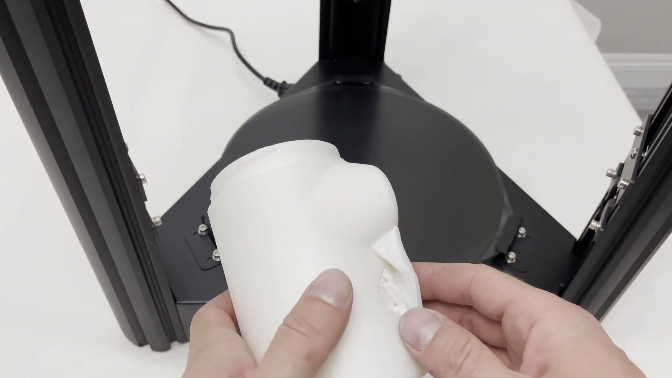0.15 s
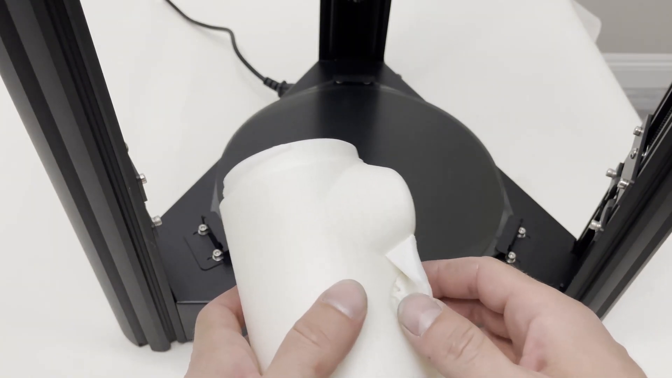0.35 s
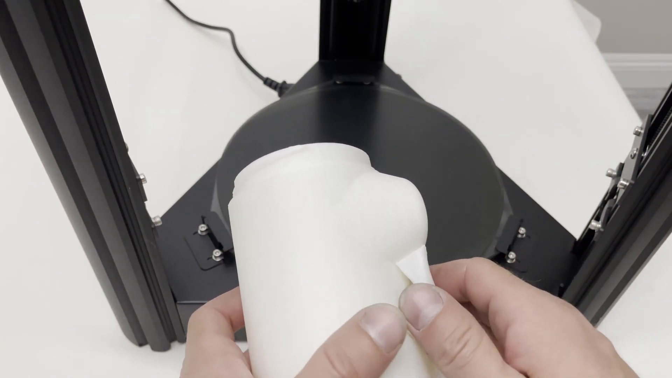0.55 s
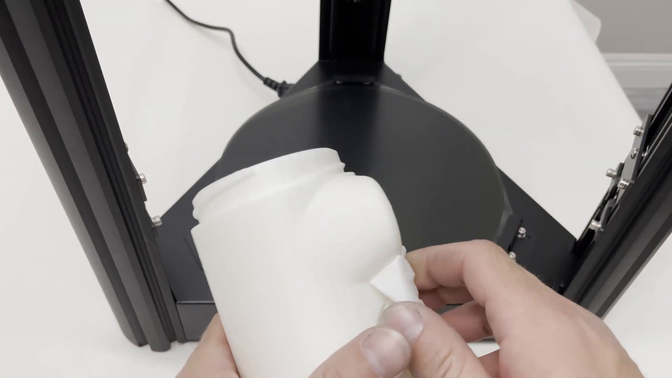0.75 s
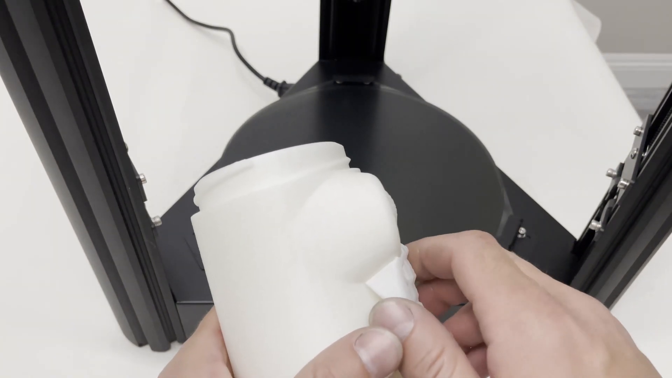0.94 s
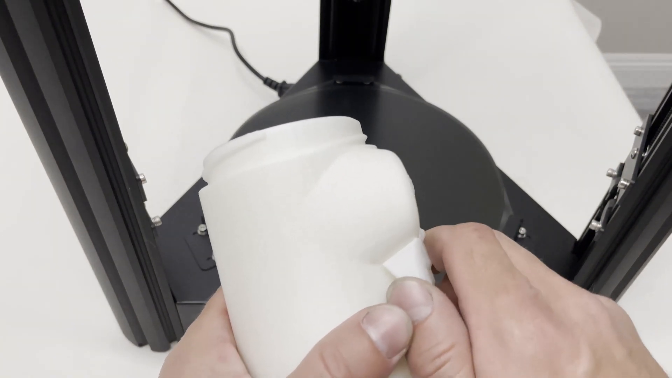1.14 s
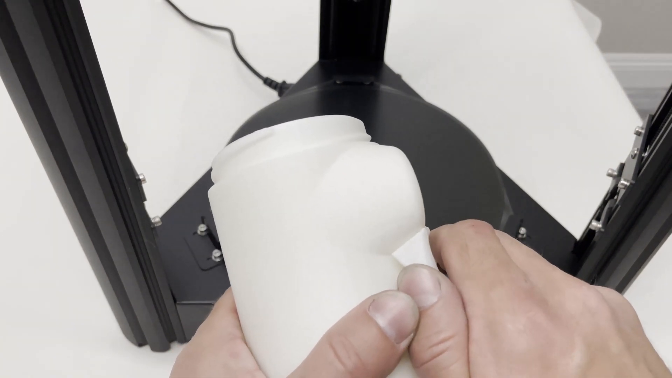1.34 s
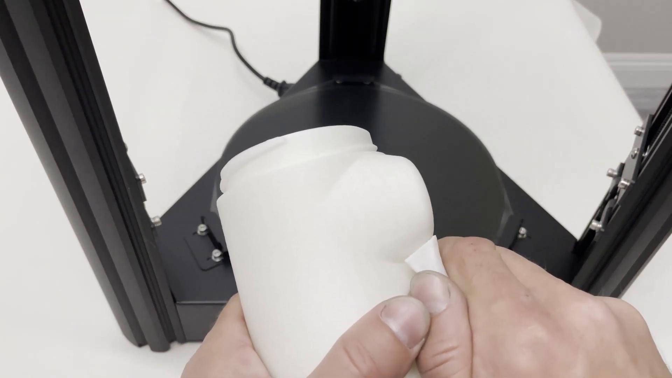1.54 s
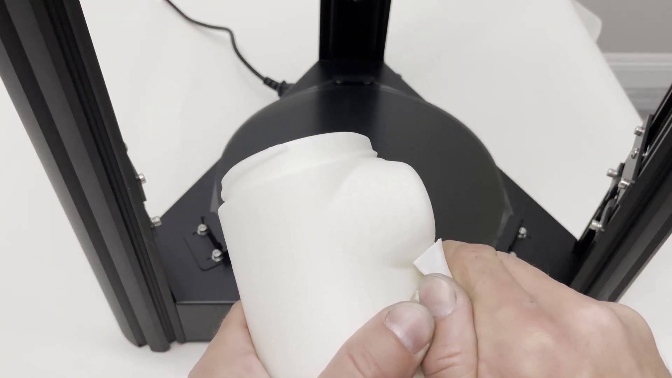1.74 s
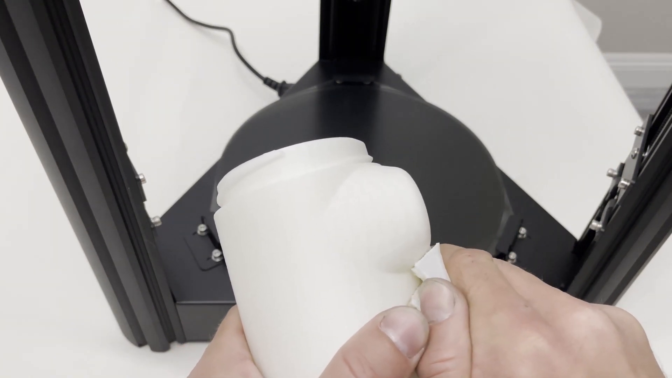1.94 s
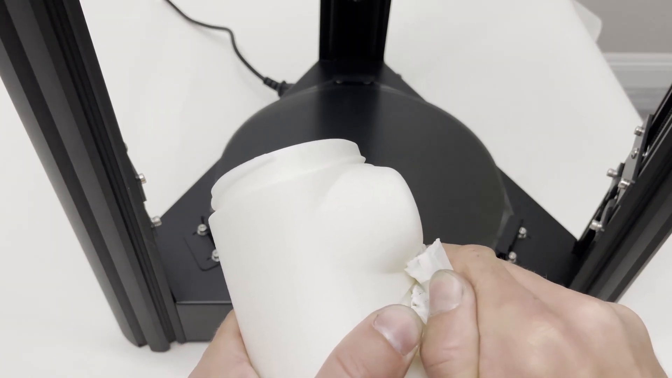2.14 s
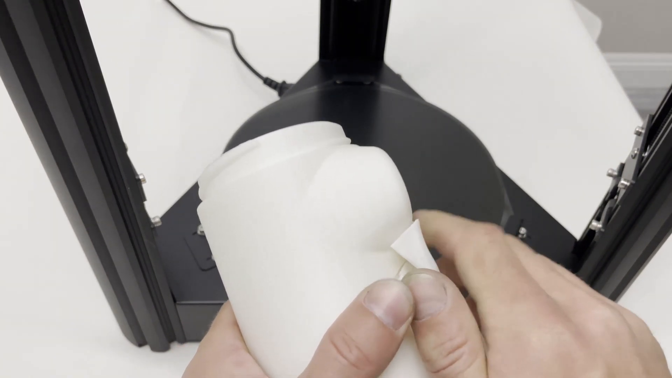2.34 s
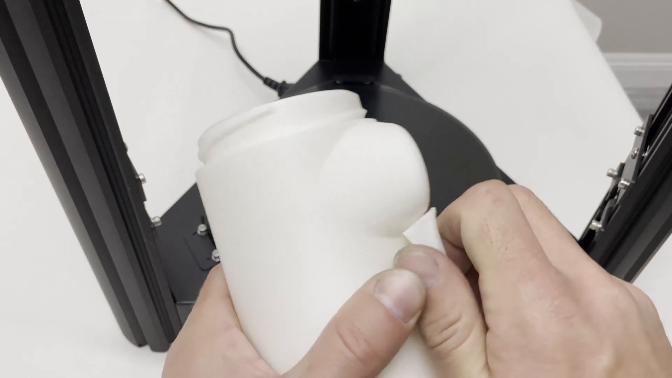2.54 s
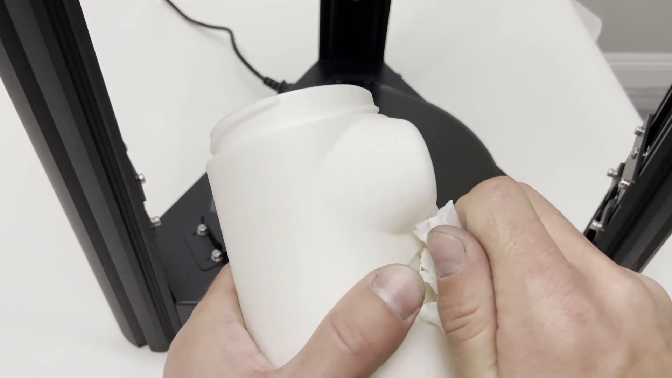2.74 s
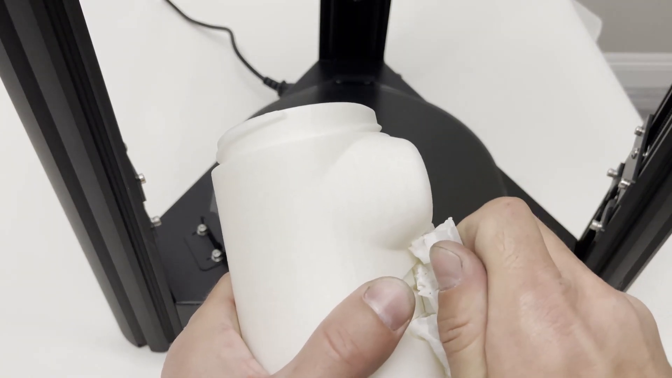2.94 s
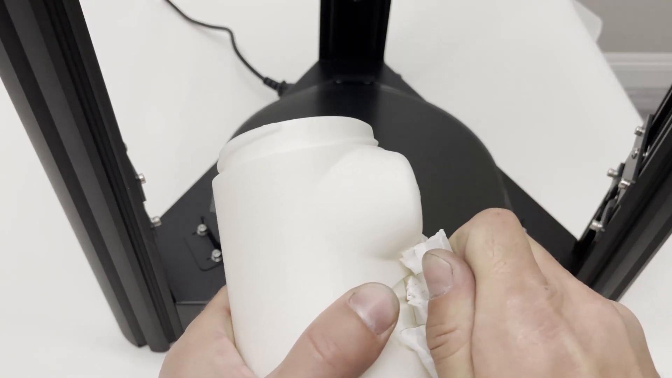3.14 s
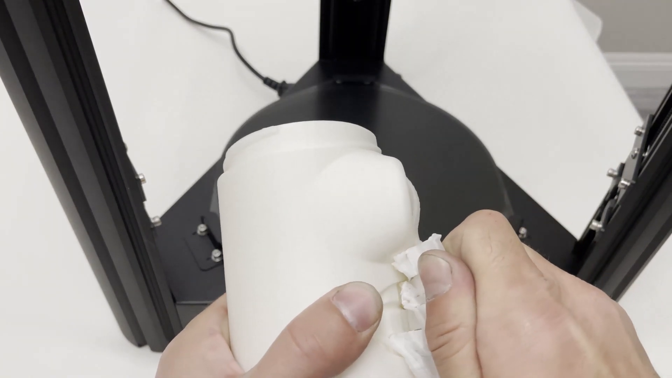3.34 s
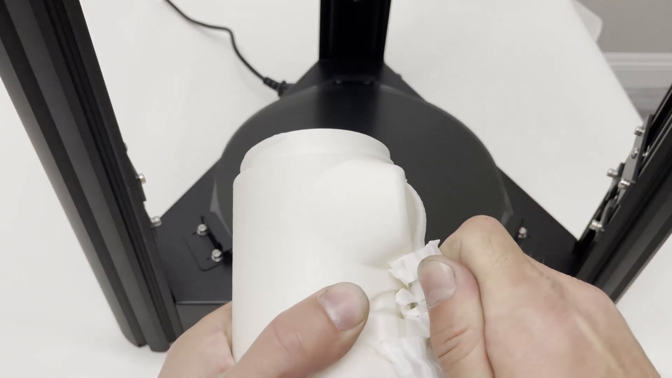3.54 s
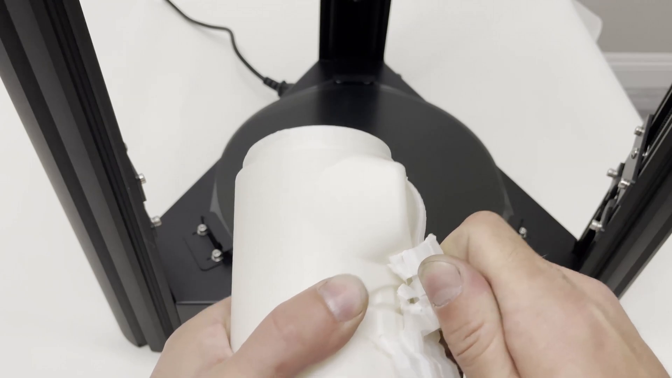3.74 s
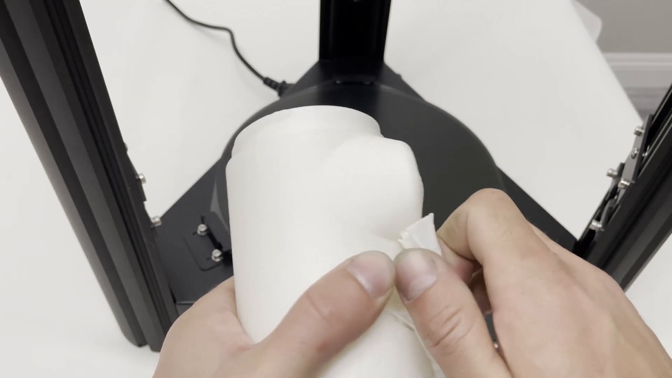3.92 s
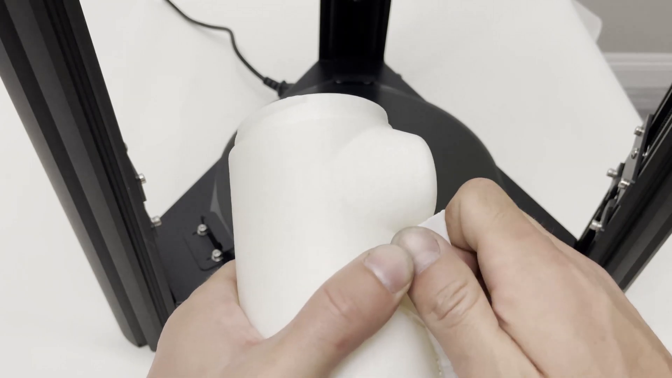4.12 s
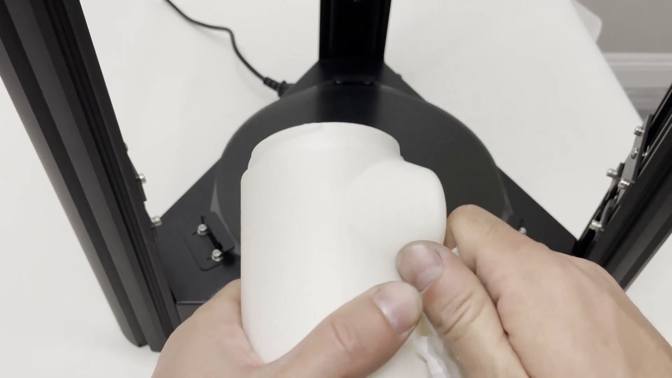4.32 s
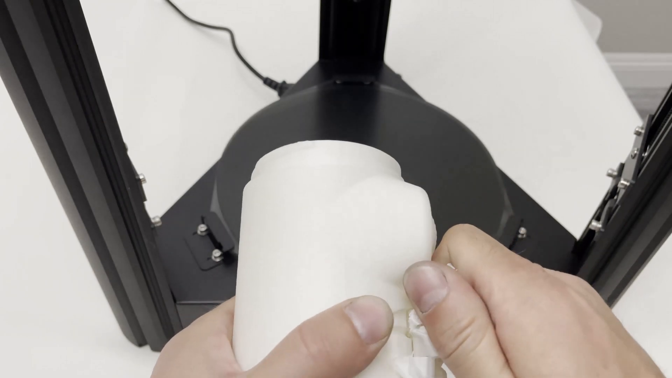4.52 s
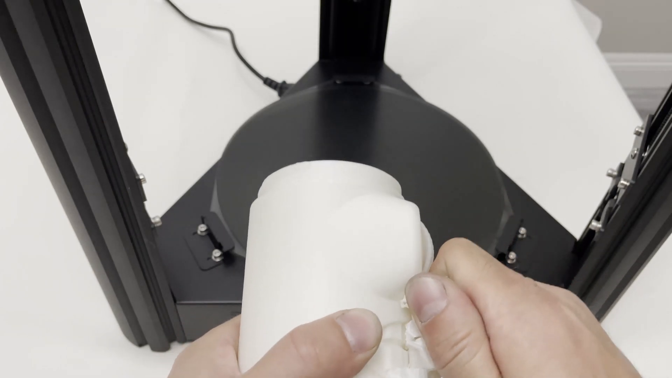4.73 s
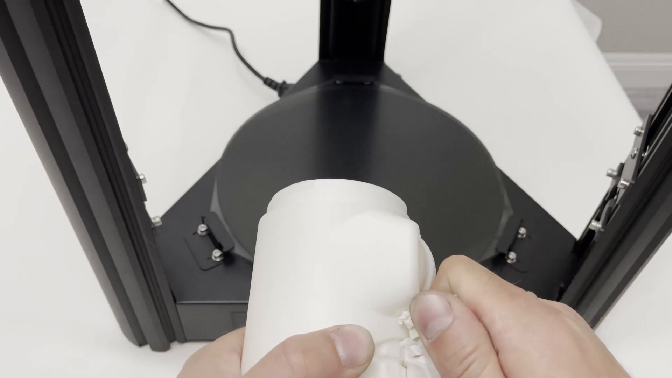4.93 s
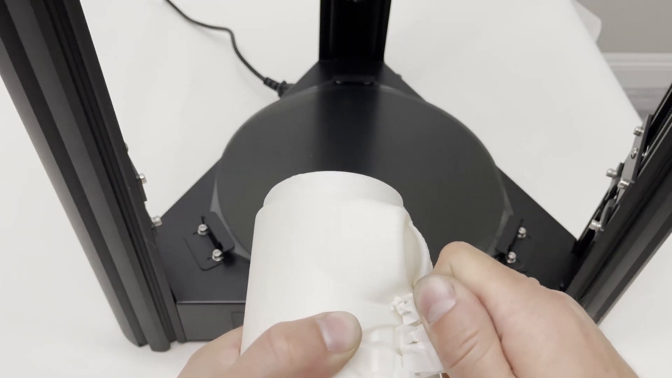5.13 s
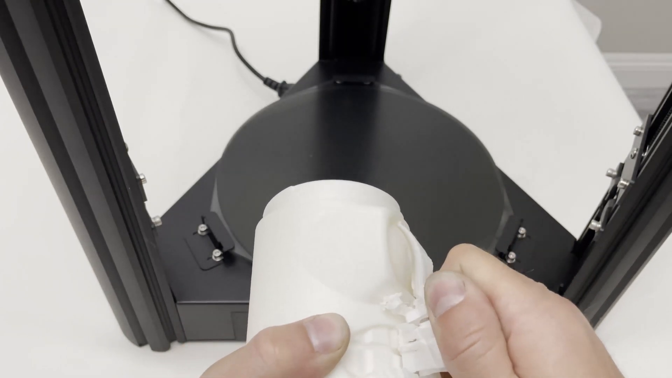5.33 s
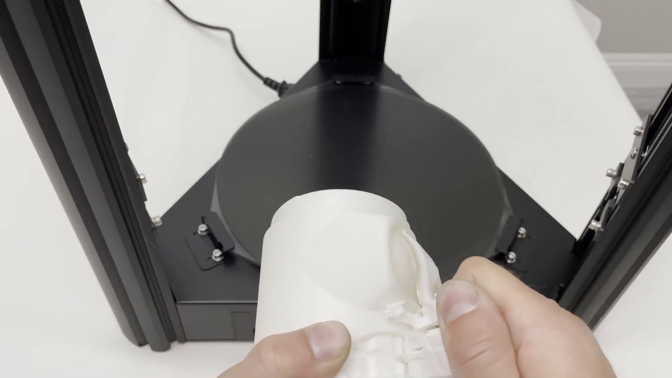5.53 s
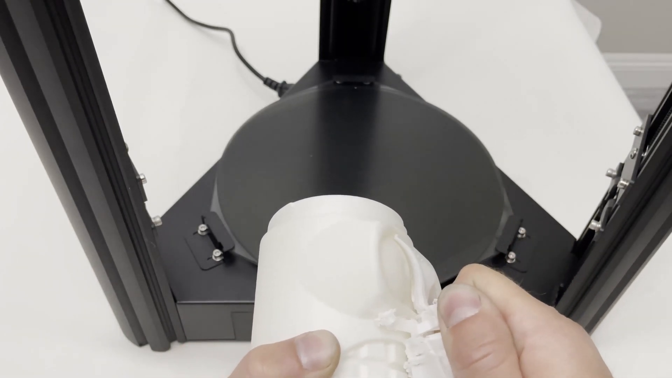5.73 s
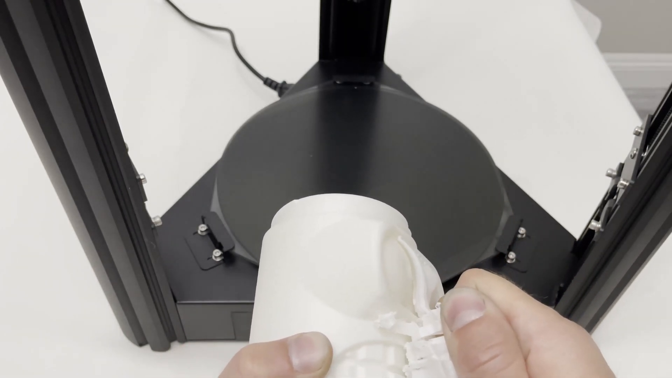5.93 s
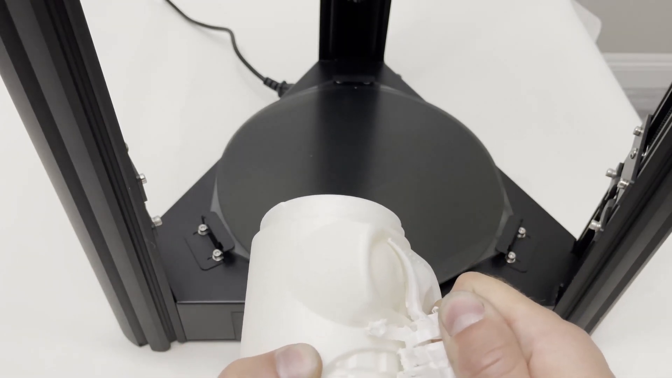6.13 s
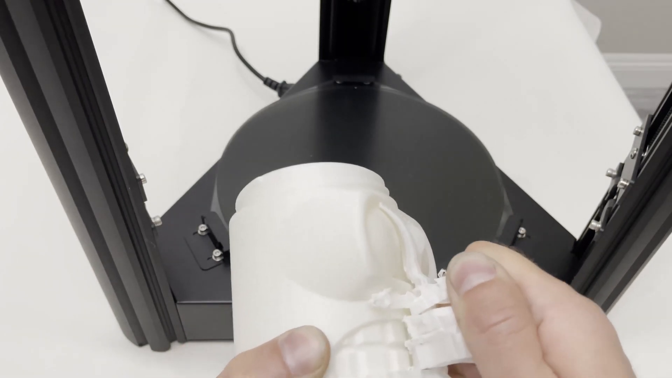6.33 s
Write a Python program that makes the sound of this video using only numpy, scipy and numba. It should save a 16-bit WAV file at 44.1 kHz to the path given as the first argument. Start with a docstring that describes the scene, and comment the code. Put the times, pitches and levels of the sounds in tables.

```python
"""Hands tear brittle plastic supports off a hollow printed object, close to a phone in a small room.
Each strand parts with a tick and a short tear, whose noise bursts excite wall and shell resonances.
Jolts of the object add knocks and thumps, and fingers rub its ridges as uneven grains of noise.
Under it lie a fan, made of shaped noise, and a slightly wavering mains hum, made of sines."""
import sys
import numpy as np
from scipy import signal
from scipy.fft import rfft, irfft, next_fast_len
from scipy.io import wavfile
from numba import njit

SR = 44100
rng = np.random.default_rng(int(sys.argv[2]) if len(sys.argv) > 2 else 0)


def generate_wav(signal):
    """Clip the signal to [-1, 1] and save it as 16-bit WAV at the path in sys.argv[1]."""
    frames = np.transpose(np.atleast_2d(signal))
    scaled = np.clip(frames, -1, 1) * 32767
    pcm = np.round(scaled).astype(np.int16)
    wavfile.write(sys.argv[1], SR, pcm)


N = 285309
SIZE = next_fast_len(N + SR)  # room for a one-second reverberant tail
FREQ = np.maximum(np.arange(SIZE // 2 + 1) * SR / SIZE, 1)


def undb(db):
    """Decibel definition: amplitude ratio is 10 to the power dB / 20."""
    return 10 ** (np.asarray(db) / 20)


def level(x, db):
    """Root-mean-square normalisation: scale a signal to the given rms level."""
    return x * undb(db) / np.sqrt(np.mean(x ** 2))


def over_hz(table):
    """Logarithmic frequency scale: interpolate the columns of a (Hz, ..) table at every frequency."""
    hz, *columns = np.transpose(table)
    return [np.interp(np.log(FREQ), np.log(hz), column) for column in columns]


@njit
def svf(x, hz, width):
    """Damped resonance: a state-variable band-pass with gain 1 at its centre."""
    y, band, low = np.empty(len(x)), 0., 0.
    g, damping = np.tan(np.pi * hz / SR), width / hz
    for i in range(len(x)):
        v = (band + g * (x[i] + 1e-18 - low)) / (1 + g * (g + damping))
        band, low = 2 * v - band, low + 2 * g * v
        y[i] = damping * v
    return y


def ring(x, modes, drive=lambda hz: 1):
    """Modal superposition: resonances of alternating sign, each driven by its own share of the force."""
    total = 0
    for k, (hz, width, db) in enumerate(modes):
        total = total + (-1) ** k * undb(db) * svf(x * drive(hz), 1. * hz, 1. * width)
    return total


def uneven_noise(scatter_db):
    """Impulsive noise: Gaussian samples whose dB sizes scatter exponentially, so a few stand out."""
    return rng.standard_normal(N) * undb(scatter_db * rng.exponential(1, N))


def tears(times, level_db, peak_ms, first_db, scatter_db):
    """Brittle fracture: a first break, then a spatter of fibre breaks that swells and dies away."""
    t = np.arange(1024) / SR
    out = np.zeros(N + len(t))
    for start, db in zip(times, level_db):
        sign, size = rng.standard_normal(len(t)), rng.exponential(1, len(t))
        swell = t * np.exp(-1000 * t / peak_ms)  # strongest at peak_ms
        burst = sign * undb(scatter_db * size) * swell
        burst = burst / np.linalg.norm(burst)
        burst[0] = undb(first_db) * np.sign(sign[0])
        i = int(start * SR)
        out[i:i + len(t)] += undb(db) * burst
    return out[:N]


def nearest(times, own_hz, octave_db, most_db):
    """Selective excitation: the latest break drives the modes near its own pitch hardest."""
    latest = np.maximum(np.searchsorted(times, np.arange(N) / SR, side="right") - 1, 0)

    def drive(hz):
        loss_db = octave_db * np.abs(np.log2(hz / own_hz))
        return undb(-np.minimum(loss_db, most_db))[latest]
    return drive


# Spectrum of the fan's air noise. Each row: frequency in Hz, relative spectral level in dB.
FAN_SPECTRUM = [(15, -39.5), (25, -26.5), (55, -2.5), (86, -16), (102, -11), (123, -4.5), (146, -11),
                (209, -8.5), (248, -13), (333, -10.5), (404, -10.5), (489, -9), (567, -25), (701, -23),
                (4000, -52), (5200, -94.5), (8800, -120)]
# Tones of the mains hum. Each row: frequency in Hz, rms level in dB before the dips.
HUM_TONES = [(120, -65.5), (330, -70)]
# Brief dips of the rumble. Each row: centre in seconds, half length in seconds, depth in dB.
RUMBLE_DIPS = [(2.215, 0.061, -16), (3.713, 0.16, -5), (5.727, 0.05, -10)]


def fan():
    """Broadband flow noise as filtered noise, with an amplitude-modulated mains hum."""
    t = np.arange(N) / SR
    air = irfft(rfft(rng.standard_normal(SIZE)) * undb(over_hz(FAN_SPECTRUM)[0]))[:N]
    waver_db = level(svf(rng.standard_normal(N), 5.5, 33.0), 8.0)  # rms swing about 2.5 dB
    hum = sum(level(np.sin(2 * np.pi * hz * t) * undb(waver_db), db) for hz, db in HUM_TONES)
    dip_db = sum(db * np.exp(-((t - s) / half) ** 4) for s, half, db in RUMBLE_DIPS)
    return (level(air, -59) + hum) * undb(dip_db)


# Resonances of the hollow shell, which the supports also excite.
# Each row: frequency in Hz, width in Hz, relative level in dB.
SHELL_MODES = [(1300, 990, -3), (1445, 40, 8.5), (1660, 241, 5.5), (1816, 131, 14.5), (1859, 240, 10),
               (2039, 157, 12), (2236, 1000, 1)]
# Colour of the rubbing noise. Each row: frequency in Hz, width in Hz, relative level in dB.
RUB_COLOUR = [(880, 104, 2.5), (3500, 2700, -3), (7340, 2000, -12.5)]
# Fingers sliding on the ridges, one list of rows per slide.
# Each row: time in seconds, level of the slide in dB, hollow shell relative to the rub colour in dB.
SLIDES = [
    [(0.0, -75, 2), (.14, -70.5, -13), (.19, -97, -14), (0.4, -79, -14), (0.44, -62.5, -12),
     (.51, -57.5, -1), (.55, -63.5, -4), (.8, -67, -7), (0.97, -68, -1), (1.0, -59, 0.5), (1.06, -64, -1),
     (1.1, -49.5, 6), (1.15, -59, -4), (1.41, -91, 11), (1.455, -67, -15), (1.56, -92, -7),
     (1.62, -76.5, 11.5), (1.745, -73, 3.5)],
    [(2.55, -64, 2), (2.738, -72, -7), (2.77, -55.5, 2.5), (2.8, -50.5, 2)],
    [(4.1, -73, -4), (4.216, -70, 5.5), (4.5, -62, -13)],
]


def fingers():
    """Stick-slip friction: skin on fine ridges gives uneven grains that hiss, fizz and stir the shell."""
    t, out = np.arange(N) / SR, 0
    slip_db = level(svf(rng.standard_normal(N), 30.0, 160.0), 12.4)  # rms swing about 4.2 dB
    grains = uneven_noise(1.6) * undb(slip_db)
    hiss = level(ring(grains, RUB_COLOUR), 0)
    fizz = level(ring(grains, [(11600, 4000, 0)]), 0)
    hollow = level(ring(grains, SHELL_MODES[1:6]), 0)
    for rows in SLIDES:
        s, slide_db, hollow_db = np.transpose(rows)
        mix = hiss + undb(-4.5) * fizz + undb(np.interp(t, s, hollow_db)) * hollow
        out = out + undb(np.interp(t, s, slide_db, -150, -150)) * mix
    return out


# Resonances of the knocked object. Each row: frequency in Hz, width in Hz, relative level in dB.
KNOCK_MODES = [(506, 170, 3), (853, 82, 6), (1020, 190, -1), (1170, 180, -1), (1300, 240, -3)]
# The object jerking in the hands.
# Each row: start in seconds, relative knock level in dB, relative thump level in dB, knock pitch in Hz.
JOLTS = [(1.778, -32, -51.5, 1190), (2.121, -19, -52, 1300), (2.347, -29, -52, 600),
         (2.836, -40, -48.5, 960), (2.934, -25.5, -57, 1090), (3.151, -37.5, -52, 910),
         (3.262, -28, -63, 1170), (3.306, -33.5, -62, 1140), (3.326, -36, -65, 1200),
         (3.441, -35, -55, 800), (3.458, -18.5, -65, 1180), (4.003, -35, -60, 935), (4.708, -34, -55, 853),
         (4.925, -31, -56, 1210), (5.193, -28, -59, 1200), (5.28, -24, -41, 1160), (5.329, -30, -46, 1200),
         (5.632, -27.5, -47, 830), (5.662, -18.5, -60, 1065), (5.796, -35, -73, 880),
         (6.279, -38, -77, 1200)]


def jolts():
    """Impact excitation: the object jerks in the grip, with a woody knock and a soft thump in the palm."""
    s, knock_db, thump_db, knock_hz = np.transpose(JOLTS)
    knock = ring(tears(s, knock_db, 2.3, -12, 1.4), KNOCK_MODES, nearest(s, knock_hz, 33, 17.5))
    thump = ring(tears(s, thump_db, 2.4, 1.5, 2.2), [(407, 160, 3.6), (108, 47, 2.5)])
    return undb(34) * knock + undb(41.0) * thump


def aftershocks(times, level_db, fade_ms, scatter_db):
    """Strain relaxation: fibres keep giving way in uneven tiny breaks as each crack's strain decays."""
    strain = np.zeros(N)
    np.add.at(strain, (times * SR).astype(int), undb(level_db))
    strain = signal.lfilter([1], [1, -np.exp(-1000 / (fade_ms * SR))], strain)
    return strain * level(uneven_noise(scatter_db), 0)


# Runs of small fibres crackling under a steady pull.
# Each row: start in seconds, length in seconds, relative level in dB.
CRACKLES = [(1.11, 0.04, -79), (1.788, 0.069, -50), (3.202, .2, -63.5), (3.583, .1, -62),
            (3.968, 0.065, -57.5), (4.737, 0.046, -56), (4.83, 0.089, -56), (5.723, 0.027, -56),
            (5.805, 0.026, -49), (6.139, 0.038, -56.5), (6.301, 0.059, -71.5)]


def crackles():
    """Crackling noise: uneven small breaks under a steady pull, with 10 ms ramps at each end."""
    t, pull = np.arange(N) / SR, 0
    for start, length, db in CRACKLES:
        edge_distance = np.minimum(t - start, start + length - t)
        pull = pull + undb(db) * np.clip(edge_distance / 0.01, 0, 1)
    return pull * level(uneven_noise(6.5), 0)


# Resonances of the thin walls. Each row: frequency in Hz, width in Hz, relative level in dB.
WALL_MODES = [(2845, 560, 6), (3240, 265, 10), (3600, 520, 5.5), (4250, 550, 6), (5200, 570, 4.5),
              (5934, 210, 7.5), (6500, 920, 5.5), (8820, 85, 6)]
# Pitch at which the hollow shell answers best, as the grip shifts.
# Each row: time in seconds, pitch in Hz.
GRIP = [(1.78, 1868), (2.12, 1806), (2.4, 1830), (2.8, 1918), (3.04, 1610), (3.3, 2060), (3.53, 2106),
        (3.75, 2000), (4.02, 1686), (4.6, 2230), (4.92, 1960), (5.02, 1630), (5.19, 1797), (5.28, 1580),
        (5.66, 1780), (5.9, 1780), (6.14, 2500), (6.21, 1750), (6.28, 1260), (6.42, 1660)]
# Strands parting.
# Each row: start in seconds, relative tick level in dB, relative shell level in dB, wall pitch in Hz.
CRACKS = [(.13, -59, -71, 4000), (1.2494, -43.5, -55, 3440), (1.3094, -47, -75, 3470),
          (1.342, -62, -66, 5500), (1.4535, -36, -47.5, 7200), (1.662, -63, -53, 4500),
          (1.69, -54, -64.5, 5500), (1.7519, -28, -43.5, 4980), (1.7616, -21.5, -37, 5530),
          (1.7776, -7.5, -18.5, 3400), (1.808, -16.5, -26, 5300), (1.8296, -7, -20, 2760),
          (1.836, -22, -50, 3200), (1.9834, -15.5, -40, 3400), (2.024, -20.5, -41.5, 6600),
          (2.0282, -24, -58.5, 3530), (2.1179, -14, -20, 3500), (2.125, -6, -20, 6150),
          (2.131, -8, -36, 5200), (2.1372, -11.5, -18.5, 5500), (2.1462, -16, -32, 3830),
          (2.3479, -9, -15.5, 3110), (2.4155, -40, -36, 3070), (2.599, -40.5, -49, 3715),
          (2.7506, -42.5, -61, 3440), (2.7951, -24.5, -31, 4300), (2.8031, -16.5, -16, 3830),
          (2.833, -6.5, -28.5, 3050), (2.8374, -15.5, -16.5, 3130), (2.9235, -23, -37, 7100),
          (2.9357, -9, -23.5, 5140), (3.0242, -23, -49, 8490), (3.039, -36, -33, 2660),
          (3.0917, -14.5, -28.5, 5630), (3.147, -24.5, -49, 5090), (3.168, -8.5, -31, 6040),
          (3.2619, -9, -34.5, 8400), (3.3048, -47.5, -36.5, 3100), (3.3252, -19, -39, 5200),
          (3.348, -18.5, -39, 6160), (3.4149, -23.5, -42, 8460), (3.4425, -16, -26.5, 6460),
          (3.4558, -10.5, -14, 5200), (3.4783, -19, -26.5, 3050), (3.528, -11.5, -18.5, 3970),
          (3.577, -14.5, -38.5, 3030), (3.649, -10.5, -15, 2850), (3.669, -28, -41.5, 2700),
          (3.7258, -14, -53, 5230), (3.746, -8.5, -19, 4470), (3.7985, -15.5, -51, 7300),
          (3.9475, -27, -33.5, 3710), (4.0027, -30.5, -30, 3050), (4.023, -46, -35, 3500),
          (4.0421, -31, -29, 4470), (4.39, -27, -41, 3500), (4.488, -41, -66, 3540),
          (4.5063, -33, -46.5, 3280), (4.538, -16.5, -31, 6100), (4.601, -34.5, -36.5, 3200),
          (4.7077, -5, -30, 8700), (4.7137, -7.5, -30, 8650), (4.7395, -18, -36.5, 2810),
          (4.756, -22, -32.5, 3760), (4.781, -29.5, -50, 4460), (4.8603, -22.5, -51, 3390),
          (4.878, -15, -50, 8230), (4.888, -25, -45, 6100), (4.9169, -5.5, -33.5, 6000),
          (4.924, -20, -17.5, 8000), (4.9438, -20, -43, 6200), (4.9618, -23.5, -48, 4820),
          (5.0142, -10, -30, 3400), (5.0216, -17.5, -21.5, 3800), (5.032, -7.5, -38, 2920),
          (5.0421, -19, -29.5, 2950), (5.0737, -28, -54, 4540), (5.0923, -18, -59, 6420),
          (5.114, -21, -44, 4470), (5.123, -25, -44, 5890), (5.1405, -11, -31, 5650),
          (5.148, -10, -26, 3390), (5.1559, -17, -34, 6270), (5.1762, -14, -57, 6900),
          (5.1923, -15, -19.5, 3600), (5.281, -6.5, -14.5, 3020), (5.328, -5.5, -22, 2980),
          (5.3355, -15, -32.5, 4700), (5.339, -14, -28, 4270), (5.3763, -26, -42, 5200),
          (5.449, -18, -42, 4970), (5.4584, -24, -30.5, 3500), (5.4741, -13, -53, 4830),
          (5.5869, -11.5, -30.5, 3680), (5.5978, -6, -21.5, 6000), (5.628, -2.5, -25.5, 6500),
          (5.632, -20, -11, 4660), (5.661, -11, -16, 2840), (5.7437, -29, -34, 3420),
          (5.7861, -41, -24.5, 2750), (5.7965, -9.5, -19.5, 6300), (5.822, -20, -35, 3400),
          (5.834, -16.5, -31, 6140), (5.848, -21, -58, 6500), (5.8944, -7.5, -22, 4020),
          (6.1207, -21.5, -38.5, 2900), (6.1422, -18, -26, 2760), (6.1918, -25, -45, 3220),
          (6.211, -6.5, -30, 3740), (6.277, -65, -29, 2720), (6.417, -26, -76, 8500),
          (6.425, -41.5, -38.5, 3630)]


def supports():
    """Direct and structure-borne sound: ticks go straight to air, walls and shell resonate to the tear."""
    small_breaks = crackles()
    s, tick_db, shell_db, wall_hz = np.transpose(CRACKS)
    # the walls lie between tick and shell in level
    wall_db = tick_db + 0.52 * (shell_db - tick_db) + 2.5
    shell_hz = np.interp(s, *np.transpose(GRIP))

    tick = ring(tears(s, tick_db, 1.0, 0.5, 3.1), [(11680, 6700, 4.5), (13750, 6800, -3.0)])
    wall = ring(tears(s, wall_db, 1.83, -13.5, 2.5), WALL_MODES, nearest(s, wall_hz, 23, 7.94))
    shell = ring(tears(s, shell_db, 0.83, -8.5, 2.95), SHELL_MODES, nearest(s, shell_hz, 40.8, 9.74))

    trailing = undb(-54.5) * aftershocks(s, wall_db, 36.0, 4.1)
    wall = wall + ring(trailing + small_breaks, WALL_MODES)
    tiny_ticks = undb(3.0) * trailing + undb(13) * small_breaks
    tick = tick + ring(tiny_ticks, [(12300, 4000, 0.012)])
    shell = shell + ring(undb(-8.0) * small_breaks, SHELL_MODES)

    no_bass = signal.butter(2, 1000., "high", fs=SR, output="sos")  # thin strands radiate no bass
    return signal.sosfilt(no_bass, undb(14.5) * tick + undb(23) * wall + undb(31.5) * shell)


# Reverberation of the small room.
# Each row: frequency in Hz, 60 dB decay time in seconds, relative tail level in dB.
ROOM_BANDS = [(300, .4, -19.5), (930, 1, -27), (2000, 0.74, -25.5), (4820, 0.59, -22), (8300, 0.34, -21.5),
              (12100, 0.49, -41)]


def room(x):
    """Reflection and reverberation: one wall echo, and a diffuse tail decaying at each band's own rate."""
    t, tail = np.arange(SR) / SR, 0
    hz, t60, tail_db = np.transpose(ROOM_BANDS)
    for k in range(len(ROOM_BANDS)):
        share = over_hz(np.c_[hz, np.arange(len(hz)) == k])[0]  # overlapping triangular bands
        onset = np.minimum(t / 0.004, 1)
        fade = rng.standard_normal(SR) * 1000 ** (-t / t60[k]) * onset
        tail = tail + undb(tail_db[k] - 16.5) * share * rfft(fade, SIZE)
    echo_s, echo_db = .014, -18
    echo = undb(echo_db) * np.exp(-2j * np.pi * FREQ * echo_s)
    return irfft(rfft(x, SIZE) * (1 + echo + tail))[:N]


# The two microphone ports. Each row: frequency in Hz, phase lead of the left in radians,
# likeness from 0 to 1, left level minus right level in dB.
PORTS = [(60, 0.4, 0.98, 2.5), (399, 0.97, 0.36, 3), (1400, 1.32, 0.62, 3), (2220, 1.5, 0.7, 1),
         (3500, 2.5, 0.42, 2), (6290, 4.5, 0, 4), (8320, 4, 0.79, 0.5), (11150, 1.48, 0.84, 0.5),
         (13340, 0.5, 1, 0.5)]


def ports(near, other):
    """Interaural-style coherence: right gets a phase-shifted copy of left mixed with an unlike view."""
    lead, like, pan_db = over_hz(PORTS)
    like = np.clip(like, 0, 1)
    a, b = rfft(near, SIZE), rfft(other, SIZE)
    right = like * a * np.exp(-1j * lead) + np.sqrt(1 - like ** 2) * b
    return np.array([irfft(a * undb(pan_db / 2)), irfft(right * undb(-pan_db / 2))])[:, :N]


def scene():
    """Linear superposition: two independent views of the same events, heard by two ports."""
    near, other = (room(supports() + jolts()) + fingers() + fan() for _ in range(2))
    return ports(near, other)


def record(dry):
    """Band limiting and saturation: the phone drops deep bass, rounds loud peaks and cuts the top."""
    bass_hz, top_hz = 42.4, 15450
    no_bass = signal.butter(2, bass_hz, "high", fs=SR, output="sos")
    no_top = signal.ellip(8, .2, 90, top_hz, fs=SR, output="sos")
    rounded = np.tanh(1.154 * signal.sosfilt(no_bass, dry))
    return signal.sosfilt(no_top, rounded)


dry = scene()
out = record(dry)
generate_wav(out)
```